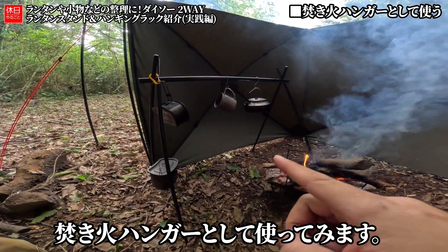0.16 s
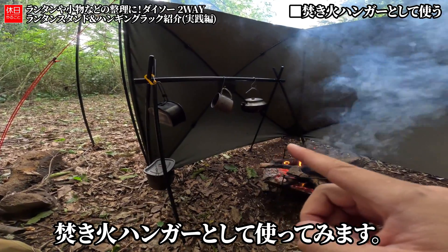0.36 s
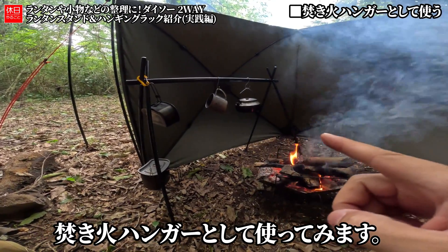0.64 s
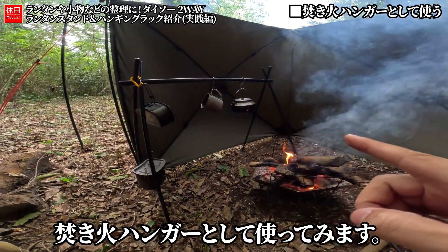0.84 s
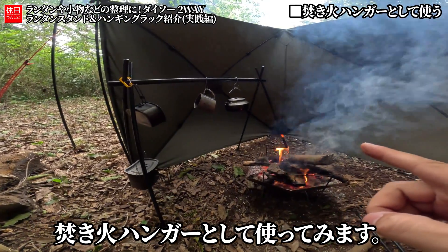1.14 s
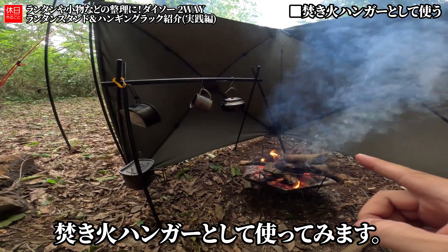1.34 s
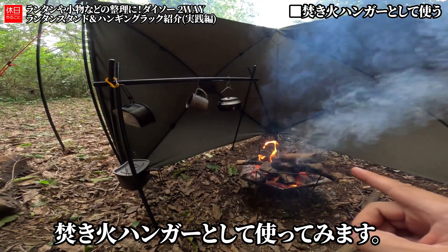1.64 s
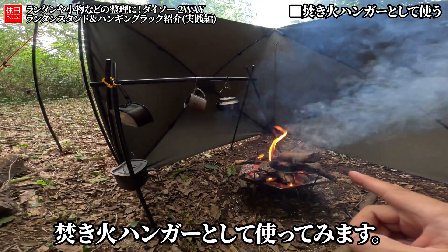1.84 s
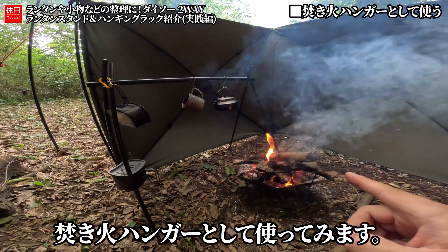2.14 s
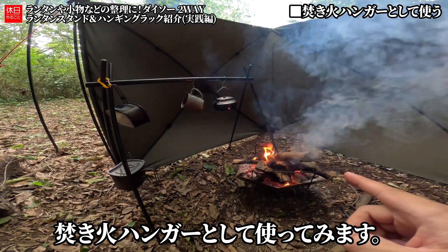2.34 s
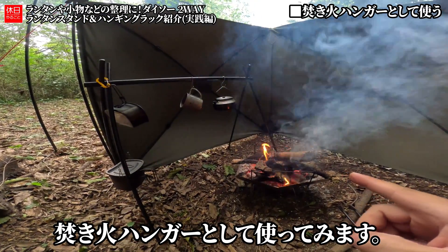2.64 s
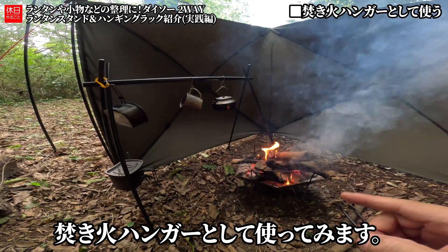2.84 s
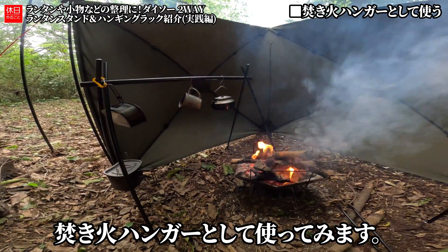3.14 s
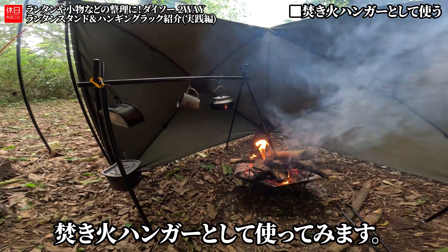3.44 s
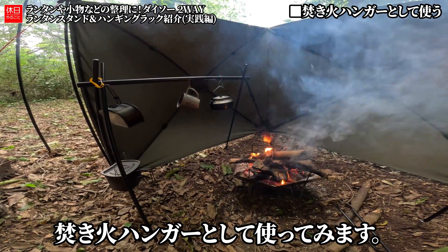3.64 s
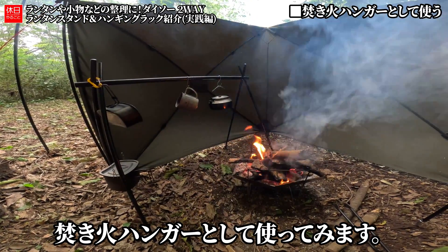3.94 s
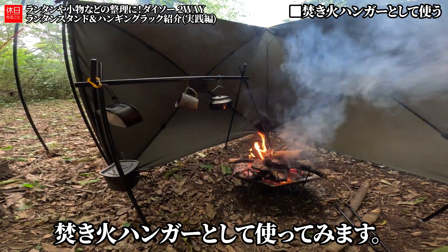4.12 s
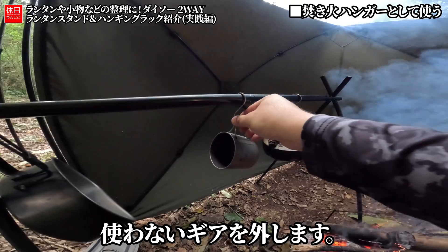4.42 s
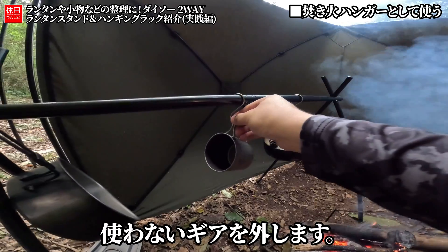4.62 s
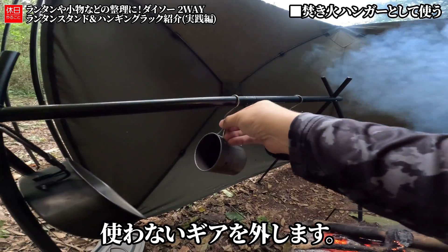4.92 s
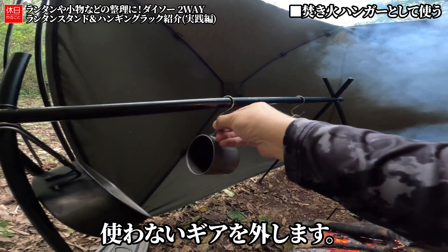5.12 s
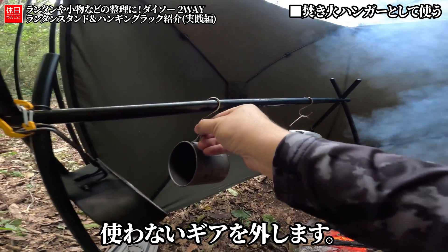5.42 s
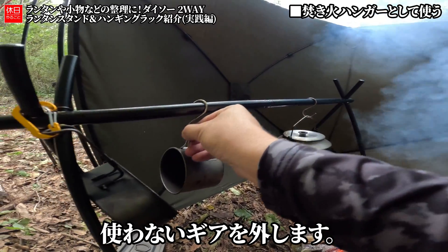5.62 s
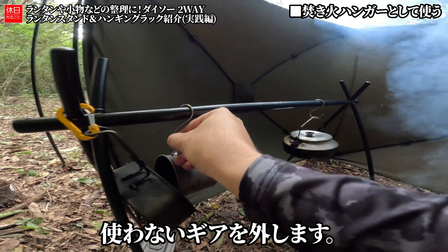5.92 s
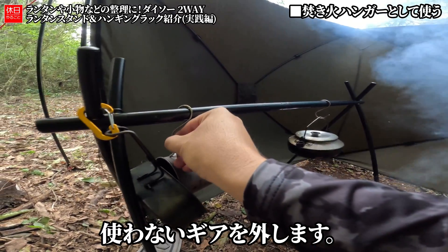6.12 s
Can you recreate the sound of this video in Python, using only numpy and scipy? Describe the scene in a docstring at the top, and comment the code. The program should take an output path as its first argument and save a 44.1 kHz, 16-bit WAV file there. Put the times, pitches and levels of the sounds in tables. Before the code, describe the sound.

A handheld microphone at a quiet woodland camp first catches a sharp fire snap, faint ticks, dull flame thuds, swelling insect buzz, distant chirps and a brief scuff of dry leaves. After an abrupt cut it is near a hanging rack, where a held mug gives small damped clinks, its hook rubs thinly along a metal bar, and finally it strikes a pot that rings briefly.

```python
"""Camp in a wood, mug on a metal rack

A fire pops, ticks and flaps; insects drone, far birds chirp and air rumbles on the microphone. From 4.2 s the
wood is quieter and the fire's ticks stop; close by, a hand takes a mug, which clinks on its hook; the hook
scrapes along the bar and the mug clanks into a hanging pot. Struck metal is a bank of decaying modes; scrape,
fire, leaves and air are coloured noise; birds and the near insect are gliding tones."""
import sys
import numpy as np
from scipy import signal
from scipy.fft import rfft, irfft, next_fast_len
from scipy.io import wavfile
from scipy.ndimage import uniform_filter1d

SR = 44100
rng = np.random.default_rng(int(sys.argv[2]) if len(sys.argv) > 2 else 0)


def pcm_store(signal):
    """Save signal as 16-bit PCM."""
    levels = np.round(np.clip(np.atleast_2d(signal), -1, 1) * 32767)
    wavfile.write(sys.argv[1], SR, levels.astype(np.int16).T)


N = 276507
TIME = np.arange(N) / SR
DROP_S = 4.2   # from here on the wood is quieter and the fire's ticks stop


def from_db(db):
    """Decibels to amplitude gain."""
    return 10 ** (np.asarray(db) / 20)


def rms_one(x):
    """Scale to unit power."""
    return x / np.sqrt(np.mean(x ** 2) + 1e-20)


def in_time(rows):
    """Interpolate each column after the first (time) to every sample."""
    s, *columns = np.transpose(rows)
    return [np.interp(TIME, s, column) for column in columns]


def bell(centre_s, sigma_s):
    """Gaussian swell with peak 1."""
    return np.exp(-((TIME - centre_s) / sigma_s) ** 2 / 2)


def pan(left_db):
    """Channel gains for a left-minus-right level."""
    return from_db(np.array([[left_db], [-left_db]]) / 2)


def drift(corner_hz):
    """Random wander of rms 1, rolled off above the corner."""
    hz = np.arange(N // 2 + 1) * SR / N
    spectrum = rfft(rng.standard_normal(N)) / (1 + (hz / corner_hz) ** 2)
    return rms_one(irfft(spectrum, N))


def white(side_db):
    """White stereo noise: a shared mid plus an opposed side."""
    mid, side = rng.standard_normal((2, N))
    return mid + from_db(side_db) * np.array([side, -side])


def noise(colour, side_db):
    """Stereo noise of rms 1 with a given spectrum, falling 30 dB per octave past its ends."""
    size = next_fast_len(N)
    octave = np.log2(np.maximum(np.arange(size // 2 + 1) * SR / size, 1))
    hz, db = np.transpose(colour)
    knots = np.log2(hz)
    beyond = np.abs(octave - np.clip(octave, knots[0], knots[-1]))
    gain = from_db(np.interp(octave, knots, db) - 30 * beyond)
    return rms_one(irfft(rfft(white(side_db), size) * gain, size)[:, :N])


def evened(x, length_s):
    """Divide out the slow swells of a noise."""
    power = uniform_filter1d(np.mean(x ** 2, axis=0), int(length_s * SR))
    return x / np.sqrt(power + 1e-6)


def resonate(x, hz, width_hz):
    """Two-pole resonance with peak gain 1."""
    r = np.exp(-np.pi * width_hz / SR)
    zeros = np.array([1, 0, -1]) * (1 - r * r) / 2
    return signal.lfilter(zeros, [1, -2 * r * np.cos(2 * np.pi * hz / SR), r * r], x)


def resonate_twice(x, hz, width_hz):
    """Two equal resonances in series, for steeper skirts."""
    return resonate(resonate(x, hz, width_hz), hz, width_hz)


def high_pass(x, hz):
    """Small things radiate little bass."""
    return signal.sosfilt(signal.butter(4, hz, "high", fs=SR, output="sos"), x)


def delayed(x, lag_samples):
    """Read both channels late; a moving lag bends the pitch."""
    return np.array([np.interp(np.arange(N) - lag_samples, np.arange(N), side) for side in x])


def from_right(x, lag_samples):
    """Sound from the right reaches the left channel later."""
    return np.array([delayed(x, lag_samples)[0], x[1]])


def clicks(times_s, heights):
    """Single-sample impulses."""
    out = np.zeros(N)
    index = np.clip(np.round(np.asarray(times_s) * SR).astype(int), 0, N - 1)
    np.add.at(out, index, heights)
    return out + 1e-18


def bursts(times_s, db, t60_s, rise_s=0.00039):
    """Envelope of sudden bursts whose powers add and decay."""
    keep = np.exp(-2 * np.log(1000) / (t60_s * SR))
    soften = np.exp(-1 / (rise_s * SR))
    power = signal.lfilter([1], [1, -keep], clicks(times_s, from_db(db) ** 2))
    return signal.lfilter([1 - soften], [1, -soften], np.sqrt(power))


def struck(hits, modes, vary_db, spread_db, radiate_hz, build_cycles):
    """Each hit rings every mode; a soft contact leaves the high ones quiet."""
    s, db, contact_hz, _ = np.transpose(hits)
    out = np.zeros((2, N))
    for hz, mode_db, t60_s in modes:
        hit_db = db + mode_db + vary_db * rng.standard_normal(len(s))
        force = from_db(hit_db) / np.sqrt(1 + (hz / contact_hz) ** 4)
        r = np.exp(-np.log(1000) / (t60_s * SR))
        w = 2 * np.pi * hz / SR
        # each mode starts a random whole number of cycles late, under 1.4 ms: a less spiky onset
        lag_s = np.floor(rng.random() * .0014 * hz) / hz
        ring = signal.lfilter([0, np.sin(w)], [1, -2 * r * np.cos(w), r * r], clicks(s + lag_s, force))
        built = resonate(ring, hz, hz / (np.pi * build_cycles))
        out += pan(spread_db * rng.standard_normal()) * built
    return high_pass(out, radiate_hz)


def crack(hits, colour, t60_s, tail_db, tail_t60_s):
    """Crowd of short-lived modes at each contact, plus its scatter from tarp and ground."""
    s, _, _, db = np.transpose(hits)
    contact = bursts(s, db, t60_s) * noise(colour, side_db=-11)
    scatter = bursts(s, db + tail_db, tail_t60_s) * noise(colour, side_db=-15.5)
    return contact + scatter


# mug against pot: (time [s], strength [dB], contact cut-off [Hz], crack strength [dB])
CLANKS = [(6.1395, -72, 1200, -48), (6.1493, -29, 9000, -22.5), (6.218, -32, 1400, -40),
          (6.2462, -40, 3900, -22), (6.2505, -40.5, 4940, -40), (6.2535, -13, 580, -32)]
# modes of the pot with the mug against it: (frequency [Hz], relative level [dB], t60 [s])
POT_MODES = [(626, 0, .42), (678, -2, .35), (721, -2, .3), (808, -9, .25), (880, -9, .25), (928, -8, .3),
             (1003, -9, .3), (1036, -10, .35), (1158, -8, .44), (1270, -14, .2), (1401, -5, .08),
             (1628, -3, .14), (1730, -7, .09), (1841, -6, .1), (1938, -13, .7), (2326, -13, .35),
             (2349, -13, .35), (2660, -22, .3), (2835, -6, .08), (2940, -4, .08), (3048, -9, .4),
             (3357, -23, 1), (3578, -9, .25), (3940, -19, .45), (4301, -21, .16), (4813, -29, 1),
             (4990, -9, .11), (5222, -23, .35), (6240, -26, .12), (6850, -26, .15)]
# crack spectrum: (frequency [Hz], density [dB per Hz])
CLANK_COLOUR = [(200, -14), (430, -29), (620, 13), (1000, 1), (1650, 5.5), (2200, 0.5), (3000, 2),
                (4200, -11), (5200, -12.5), (6000, -19), (7500, -15.5), (10000, -26.5), (15000, -42)]


def pot():
    """The mug runs into the hanging pot, which rings freely and swings back against it."""
    ring = struck(CLANKS, POT_MODES, vary_db=3.0, spread_db=4.0, radiate_hz=600, build_cycles=0.23)
    contact = crack(CLANKS, CLANK_COLOUR, t60_s=.05, tail_db=-12, tail_t60_s=.3)
    return (high_pass(ring, hz=560) + contact) * pan(1.3)


# mug on its hook: (time [s], strength [dB], contact cut-off [Hz], crack strength [dB])
CLINKS = [(4.709, -46.5, 1690, -57), (4.724, -60, 7000, -48), (4.738, -50.5, 6900, -54),
          (4.7806, -46, 1970, -54), (4.8814, -63.5, 8000, -57), (4.9597, -53.5, 7860, -47.5),
          (4.9875, -62, 2000, -47.5), (4.9895, -30.5, 1070, -63), (5.0762, -48, 12200, -32),
          (5.0818, -38.5, 5200, -61), (5.1373, -55, 4000, -43), (5.1617, -43.5, 1090, -78),
          (5.3618, -47, 2580, -54), (5.42, -47, 1410, -60), (5.6865, -56, 2390, -50.5),
          (5.703, -78, 2300, -66), (5.93, -65, 2500, -65)]
# modes of mug and hook: (frequency [Hz], relative level [dB], t60 [s])
MUG_MODES = [(686, -13, .05), (830, -10, .07), (1043, 0, .125), (1975, -29, 1.3), (2054, -7, .07),
             (2326, -25, .2), (3052, -15, .09), (3340, -13, .06), (3567, -5, .19), (3572, -29, 1.3),
             (3967, 4, .11), (4075, -8, .06), (4211, -3, .07), (4325, 1, .06), (4558, -6, .06),
             (4773, -5, .06), (4942, -2, .06), (5410, -11, .05), (5778, -8, .05), (6212, -13, .06),
             (6950, -12, .05), (7241, -16, .07), (8400, -14, .04), (11120, -14, .15), (12890, -25, .18)]
# crack spectrum: (frequency [Hz], density [dB per Hz])
CRACK_COLOUR = [(500, -37), (800, 15), (1400, -6.5), (2100, 5.5), (2600, -1.5), (4400, 4.5), (6000, 4.5),
                (7500, 0.5), (9500, -11.5), (11500, -6), (15000, -24)]


def mug():
    """The held mug knocks on its hook; its modes mostly die fast, damped by the fingers."""
    ring = struck(CLINKS, MUG_MODES, vary_db=3.0, spread_db=4.0, radiate_hz=670, build_cycles=2.0)
    contact = crack(CLINKS, CRACK_COLOUR, t60_s=0.048, tail_db=-13, tail_t60_s=0.26)
    return (ring + contact) * pan(1.0)


def along_bar(x, trip_s, stretch_per_s, loss_db, count=4):
    """Waves bounce between hook and support; the trip changes as the hook travels, so peaks glide."""
    travel_s = TIME - SLIDES[-1][0][0]
    trip_samples = np.round(trip_s * SR) * (1 + stretch_per_s * travel_s)
    return rms_one(sum(from_db(k * loss_db) * delayed(x, k * trip_samples) for k in range(count)))


# hook pressed along the bar, one list a stroke: (time [s], relative level [dB])
SLIDES = [
    [(4.7, -65.5), (4.74, -67), (4.95, -70)],
    [(5.19, -66), (5.408, -56), (5.516, -59.5), (5.66, -55.5), (5.674, -63.5), (5.704, -54), (5.8, -58.5),
     (6.06, -59.5), (6.13, -65.5)],
]
# bar resonances before glide: (frequency [Hz], nominal width [Hz], relative level [dB])
BAR_MODES = [(1032, 76, -4), (1900, 68, -10.5), (3096, 42, 3.5), (3390, 125, -1.5), (3530, 4.3, 2.5),
             (4220, 255, -2), (4815, 41, -1.5), (5770, 220, -9), (6770, 460, -13.5), (7550, 31, -10),
             (8270, 110, -23), (8550, 36, -19), (9900, 81, -34), (10300, 71, -12.5), (10000, 120, -20),
             (11300, 100, -26), (11800, 40, -28), (12200, 45, -30)]
# rubbing spectrum: (frequency [Hz], density [dB per Hz])
SLIDE_COLOUR = [(500, -14.5), (850, -4), (1400, 2), (2100, 4), (2500, -1.5), (3200, 10.5), (4400, -30),
                (5300, -3.5), (7200, 3.5), (9300, -7.5), (11500, -0.5), (13000, -6), (15000, -28)]
# the fingers close round the mug: its wall falls nearly silent and the bar takes over
GRIP_S, GRIP_HALF_S = 5.57, 0.095


def slide(grain_db=3.0, stutter_db=1.5, loose_db=-3.5, rub_db=-5.5, wall_db=-2.5, gripped_db=-19.0,
          shift_db=7.5, glide=0.0039, climb_per_s=0.044, fade_s=0.028):
    """Fine slips of the hook excite mug wall and bar; the bar's resonances waver and take turns."""
    pressure = 0
    for stroke in SLIDES:
        outside_s = np.maximum(stroke[0][0] - TIME, TIME - stroke[-1][0])
        touching = np.clip(1 - outside_s / fade_s, 0, 1)
        pressure = pressure + touching * from_db(in_time(stroke)[0])
    grip = (1 + np.tanh((TIME - GRIP_S) / GRIP_HALF_S)) / 2
    grain = rms_one(from_db(grain_db * drift(350) + stutter_db * drift(18)))
    slips = grain * white(side_db=-15)

    climb = climb_per_s * np.maximum(TIME - GRIP_S, 0)   # pitch rises as the hook nears the support
    ringing = 0
    for hz, width_hz, db in BAR_MODES:
        mode = resonate_twice(slips, hz, 1.5 * width_hz)
        level = from_db(db + shift_db * np.tanh(drift(6.8)))
        ringing = ringing + level * delayed(mode, np.cumsum(glide * drift(4.3) - climb))
    bar = from_db(loose_db * (1 - grip)) * rms_one(ringing)

    rubbing = grain * noise(SLIDE_COLOUR, side_db=-9)
    rubbing = along_bar(rubbing, trip_s=.0017, stretch_per_s=-.035, loss_db=-7.5)
    rubbing = along_bar(rubbing, trip_s=.0061, stretch_per_s=.012, loss_db=-6.5)

    # the hook passes the slips on to the stronger modes of the mug's wall
    wall = sum(from_db(db) * resonate_twice(slips, hz, 70) for hz, db, _ in MUG_MODES if db >= -6)
    wall = from_db(wall_db + gripped_db * grip) * rms_one(wall)
    return pressure * (bar + wall + from_db(rub_db) * rubbing) * pan(1.0)


# wood bursting: (time [s], relative level [dB], pocket resonance [Hz])
POPS = [(0.2015, -23, 10200), (0.2053, -32, 5350), (0.2073, -35.5, 4800), (0.776, -55, 2260),
        (0.888, -54, 6000), (1.0637, -54.5, 6040), (2.116, -54, 5000), (2.137, -56, 7000),
        (2.182, -47, 3820), (2.366, -54, 6600), (2.4059, -54.5, 6000), (2.857, -52, 5470),
        (2.891, -51.5, 3990), (2.95, -53.5, 7200), (3.171, -54, 5860), (3.277, -47, 5000),
        (3.375, -56, 6550)]
# pop spectrum: (frequency [Hz], density [dB per Hz])
POP_COLOUR = [(300, -19), (850, -13.5), (1300, 0), (2300, -5.5), (3500, -0.5), (5200, 3.5), (8000, 1),
              (10000, 2), (12000, -6), (15500, -16)]
POP_T60_S, POP_DB_PER_DOUBLING = 0.0095, 60   # decay of a median pop; stronger ones last longer


def fire(ticks_per_s=9, tick_db=-69, tick_range_db=12, pop_db=-4.5, pocket_db=4, pocket_width_hz=900,
         echo_db=-15, echo_t60_s=0.11):
    """Pockets in the wood burst and resonate; until 4.2 s, tiny random ticks fill the gaps."""
    s, db, _ = np.transpose(POPS)
    snap = noise(POP_COLOUR, side_db=-11.5)
    pops = 0
    for at_s, level_db, hz in POPS:
        t60_s = POP_T60_S * 2 ** ((level_db - np.median(db)) / POP_DB_PER_DOUBLING)
        burst = bursts([at_s], [level_db + pop_db], t60_s) * snap
        pops = pops + burst + from_db(pocket_db) * resonate(burst, hz, pocket_width_hz)
    born_s = TIME[(rng.random(N) < ticks_per_s / SR) & (TIME < DROP_S)]
    born_db = tick_db + tick_range_db * (rng.random(len(born_s)) - .5)
    ticks = bursts(born_s, born_db, t60_s=0.036) * snap
    echo = bursts(s, db + echo_db, echo_t60_s) * noise(POP_COLOUR, side_db=-2.5)
    return high_pass(pops + ticks + echo, hz=985) * pan(0.16)


# steady burn: (time [s], relative level [dB])
FLAMES = [(0.0, -75), (2.17, -73.5), (2.3, -70.5), (3.26, -71.5), (3.96, -70.5), (4.2, -74.5),
          (5.57, -79.5), (6.13, -77)]
# burn spectrum: (frequency [Hz], density [dB per Hz])
FLAME_COLOUR = [(60, -21), (110, -5.5), (160, -0.5), (230, -5.5), (330, -16), (500, -26), (900, -49)]
# a flame flaps: (time [s], relative level [dB])
FLAPS = [(0.887, -49), (1.204, -47), (1.328, -51), (1.443, -53.5), (1.772, -52), (2.146, -46), (2.194, -45),
         (2.392, -56), (2.499, -50.5), (2.628, -64.5), (2.831, -44), (3.806, -49.5), (4.458, -55)]
# flap spectrum: (frequency [Hz], density [dB per Hz])
FLAP_COLOUR = [(45, -5), (70, -2.5), (110, -1.5), (170, -4.5), (250, -10.5), (400, -24.5), (700, -45)]
BURN_DB, FLUTTER_DB, FLUTTER_HZ = 1, 3, 15   # trim; depth and corner of the random flutter
FLAP_DB, FLAP_RISE_S, FLAP_T60_S = -4, 0.004, 0.13


def flames():
    """A low fluttering burn; now and then a flame flaps with a soft thud."""
    burn_db, = in_time(FLAMES)
    burn_level = from_db(burn_db + BURN_DB + FLUTTER_DB * drift(FLUTTER_HZ))
    burn = burn_level * noise(FLAME_COLOUR, side_db=-7)
    s, db = np.transpose(FLAPS)
    thuds = evened(noise(FLAP_COLOUR, side_db=-10), length_s=.02)
    return burn + bursts(s, db + FLAP_DB, FLAP_T60_S, FLAP_RISE_S) * thuds


# swish spectrum: (frequency [Hz], density [dB per Hz])
SLEEVE_COLOUR = [(700, -14), (1200, 2), (1450, 7.5), (1800, -5), (2300, 0.5), (3000, -6), (6000, -20)]


def sleeve(at_s=4.215, sigma_s=0.3, level_db=-73):
    """A soft noise swish as the arm reaches for the mug."""
    swell = from_db(level_db) * bell(at_s, sigma_s) * (TIME > DROP_S)
    return swell * noise(SLEEVE_COLOUR, side_db=-41)


# dry leaves shifting: (time [s], level [dB], Gaussian sigma [s])
RUSTLES = [(3.571, -64, 0.006), (3.589, -54.5, 0.0091), (3.659, -63.5, 0.06)]
# leaf spectrum: (frequency [Hz], density [dB per Hz])
LEAF_COLOUR = [(150, -13), (300, 6.5), (700, -14.5), (1100, 3.5), (1800, -6.5), (2700, -6), (3800, 2),
               (6000, -13.5), (10000, -18), (14000, -36)]


def leaves(grain_db=2.5):
    """A brief scuff in the leaf litter: noise with random fast grain."""
    swell = sum(from_db(db) * bell(s, sigma_s) for s, db, sigma_s in RUSTLES)
    return swell * from_db(grain_db * drift(323)) * noise(LEAF_COLOUR, side_db=-6)


# far birds: (time [s], mid-chirp pitch [Hz], level [dB], Gaussian sigma [s])
CHIRPS = [(.985, 3600, -67, .008), (1.709, 5870, -65, 0.035), (1.729, 3140, -62, .012),
          (1.889, 3110, -65.5, 0.012), (1.975, 3110, -63, .011), (2.057, 3070, -63.5, 0.016),
          (2.321, 1634, -71.5, .012), (2.566, 2920, -67, .02), (2.6, 5980, -66, 0.032),
          (2.634, 3130, -65, 0.018), (3.422, 2930, -63.5, 0.01), (3.5, 3230, -69, 0.017),
          (3.672, 3230, -67, 0.015), (3.788, 3050, -65.5, .016), (3.96, 3200, -67.5, 0.015)]
# the throat favours a second harmonic near this pitch
OVERTONE_DB, OVERTONE_HZ, OVERTONE_OCTAVES = -2, 6200, 0.23


def bird(arch=.08, rasp=.037):
    """Short arched chirps with a second harmonic, blurred by the trees as a fast pitch waver."""
    out = np.zeros(N)
    waver = rasp * drift(300)
    for s, hz, db, sigma_s in CHIRPS:
        near = np.abs(TIME - s) < .12
        u = (TIME[near] - s) / sigma_s
        pitch_hz = hz * (1 - arch * np.tanh(u / 2) ** 2 + waver[near])
        phase = 2 * np.pi * np.cumsum(pitch_hz) / SR
        off_peak = np.log2(2 * hz / OVERTONE_HZ) / OVERTONE_OCTAVES
        overtone = from_db(OVERTONE_DB) * np.exp(-off_peak ** 2 / 2)
        tone = np.sin(phase) + overtone * np.sin(2 * phase)
        out[near] += from_db(db) * np.exp(-u * u / 2) * tone
    return out


# nearest insect's swells: (time of top [s], relative level [dB])
TRILLS = [(0.1, -67), (0.422, -63.5), (0.779, -61.5), (1.219, -62), (2.97, -61), (3.35, -59), (3.72, -59.5),
          (4.13, -61.5), (4.468, -65)]
TRILL_SIGMA_S, TRILL_HZ, TRILL_SAG_HZ_PER_S = 0.091, 3997, 250


def singer():
    """One nearer insect: a rough tone that swells and fades while its pitch sags."""
    buzz = evened(noise([(20, 0), (70, -1), (160, -8), (400, -21)], side_db=-7), length_s=.025)
    song = 0
    for s, db in TRILLS:
        phase = 2 * np.pi * np.cumsum(TRILL_HZ - TRILL_SAG_HZ_PER_S * (TIME - s)) / SR
        song = song + from_db(db) * bell(s, TRILL_SIGMA_S) * np.sin(phase)
    return buzz * song


# far insect chorus: (time [s], relative level [dB])
SWARM = [(0.0, -66.5), (1.5, -66.5), (2.6, -64.5), (3.4, -66.5), (4.2, -69.5)]
# chorus bands: (frequency [Hz], width of each of two resonances [Hz], relative level [dB])
CHORUS = [(4014, 870, -5.5), (4416, 130, -4), (5130, 630, -6.5)]
# hush spectrum: (frequency [Hz], density [dB per Hz])
HUSH_COLOUR = [(300, 4.5), (600, -0.5), (850, -3), (1100, 4), (1400, 1), (2000, -6.5), (2600, -10.5),
               (3500, -5), (5500, -2.5), (7000, -5.5), (8500, -12), (10000, -12), (12000, -20),
               (14500, -42)]
HUSH_DB, DROP_DB = -70, -4.5   # steady hush; drop of the whole wood from 4.2 s


def wood():
    """Distant hush and an insect chorus with one nearer singer, all quieter from 4.2 s."""
    swarm_db, = in_time(SWARM)
    chorus = sum(from_db(db) * resonate_twice(white(side_db=-9.0), hz, width_hz)
                 for hz, width_hz, db in CHORUS)
    insects = singer() + from_db(swarm_db) * rms_one(chorus)
    hush = from_db(HUSH_DB) * noise(HUSH_COLOUR, side_db=-3)
    return (insects * pan(0.33) + hush) * from_db(DROP_DB * (TIME > DROP_S))


# breeze strength before gusts: (time [s], level [dB])
AIR = [(0.0, -70.5), (0.46, -57), (1.74, -61.5), (1.78, -56), (2.8, -57.5), (2.85, -51.5), (3.26, -59.5),
       (4.08, -56), (4.17, -59), (4.23, -64), (4.92, -59.5), (5.09, -67), (6.13, -63.5)]
# rumble spectrum: (frequency [Hz], density [dB per Hz])
AIR_COLOUR = [(20, -2.5), (35, 2), (55, -4), (80, -8.5), (120, -23.5), (200, -33.5)]
GUST_DB, GUST_HZ = 2.0, 3.8   # depth and corner of the random swells


def air():
    """Light air buffets the microphone: low noise in random swells."""
    breeze_db, = in_time(AIR)
    rumble = evened(noise(AIR_COLOUR, side_db=-15), length_s=.2)
    return from_db(breeze_db + GUST_DB * drift(GUST_HZ)) * rumble


def scene():
    """Everything at the camp, in stereo."""
    right = from_right(pot() + leaves() + bird() + wood(), lag_samples=1)
    return mug() + slide() + fire() + flames() + sleeve() + right + air()


def record(dry, cutoff_hz=15800):
    """The top is cut steeply by an elliptic low-pass."""
    return signal.sosfilt(signal.ellip(10, .1, 80, cutoff_hz, fs=SR, output="sos"), dry)


dry = scene()
out = record(dry)
pcm_store(out)
```